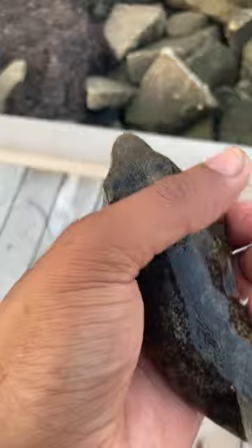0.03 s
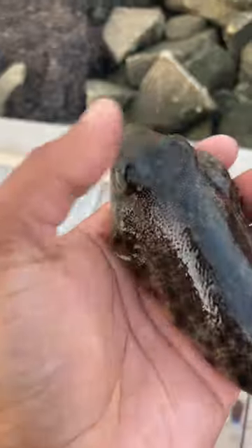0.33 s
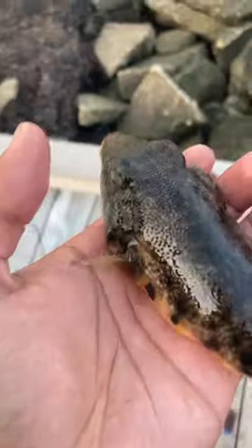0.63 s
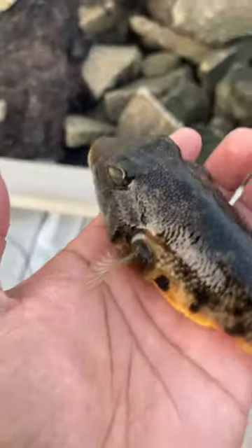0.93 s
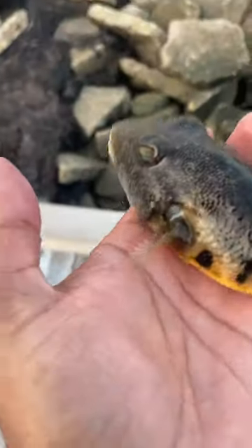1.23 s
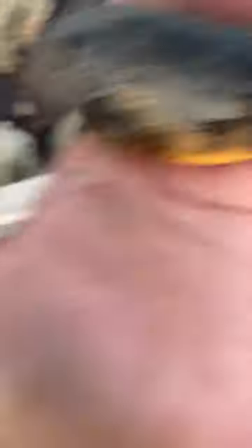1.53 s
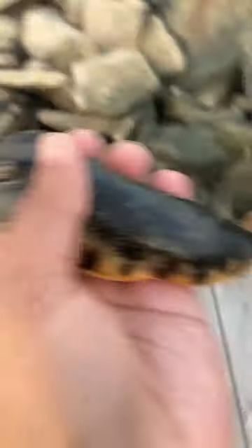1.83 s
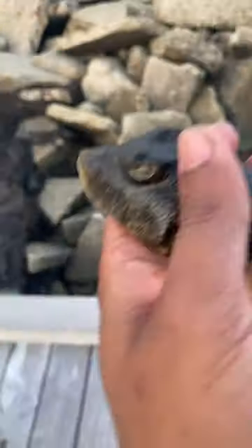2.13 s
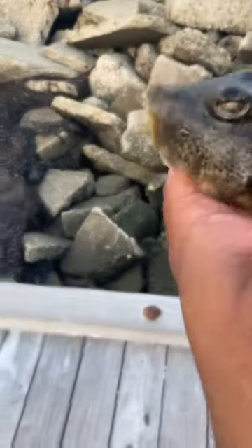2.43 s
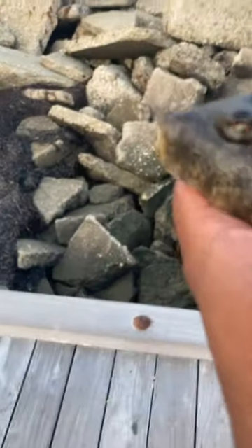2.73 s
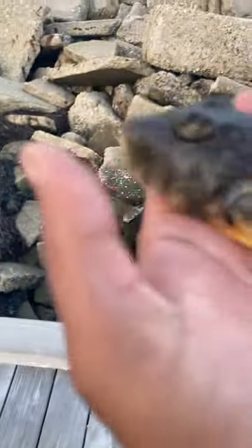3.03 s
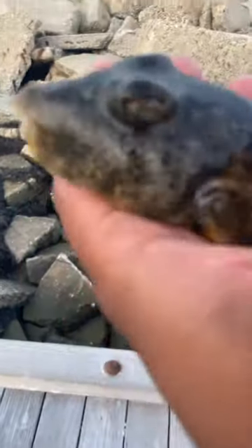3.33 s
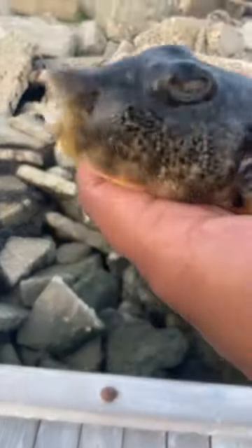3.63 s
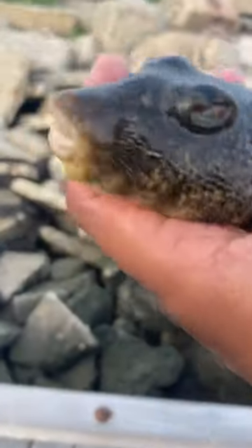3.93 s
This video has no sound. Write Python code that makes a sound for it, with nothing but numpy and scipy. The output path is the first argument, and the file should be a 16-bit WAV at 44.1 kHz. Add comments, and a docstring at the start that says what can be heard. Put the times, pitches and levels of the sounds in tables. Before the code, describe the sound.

Wind rumbles lightly on a close microphone on a dock, with faint water washing on rocks and soft rubs of a hand on a wet fish. Midway the air crackles, then gusts grow strong, hitting hardest at the end.

```python
"""Gusty wind on a dock beside a rocky shore, at a small hand-held pair of microphones. At first eddies rumble
lightly on the ports, water washes and fizzes on the rocks, and a hand shifts its grip on a wet fish with soft
rubs. Near 2 s the air crackles, a drip pings, and the fingers come unstuck in a few ticks. Then the wind grows
strong, the bass narrows to the centre, and the hardest buffets hit in the last half second."""
import sys
import numpy as np
from scipy import signal
from scipy.fft import rfft, irfft
from scipy.io import wavfile
from scipy.ndimage import uniform_filter1d

SR = 44100
rng = np.random.default_rng(int(sys.argv[2]) if len(sys.argv) > 2 else 0)


def wav_out(sig):
    """Save sig, one row per channel (or a flat mono array), as 16-bit PCM at SR to the path in sys.argv[1]."""
    wavfile.write(sys.argv[1], SR, np.round(np.clip(np.atleast_2d(sig).T, -1, 1) * 32767).astype(np.int16))


N = 176400
TIME_S = np.arange(N) / SR
FREQ_HZ = np.maximum(np.arange(N // 2 + 1) * SR / N, 1)
SIDE = np.array([[1], [-1]])


def from_db(db):
    """Decibels to gain."""
    return 10 ** (np.asarray(db) / 20)


def rms_one(x):
    """Scale to unit rms."""
    return x / np.sqrt(np.mean(x ** 2) + 1e-20)


def in_time(rows):
    """A control curve at every sample."""
    return np.interp(TIME_S, *np.transpose(rows))


def in_frequency(rows):
    """A curve at every FFT bin, interpolated in log frequency."""
    hz, value = np.transpose(rows)
    return np.interp(np.log(FREQ_HZ), np.log(hz), value)


def noise(gain, channels=2):
    """Independent noises with the given gain per bin, at unit rms."""
    return rms_one(irfft(rfft(rng.standard_normal((channels, N))) * gain, N))


def band_noise(hz, width):
    """Two noises with a bell spectrum in log frequency."""
    return noise(np.exp(-.5 * (np.log(FREQ_HZ / hz) / width) ** 2))


def even_noise(colour, span_s, channels=2):
    """Coloured noise with its slow swings divided out."""
    x = noise(from_db(in_frequency(colour)), channels)
    return x / np.sqrt(uniform_filter1d(x ** 2, int(span_s * SR), axis=-1) + 1e-9)


def drift(rate_hz):
    """Slow random curve at unit rms."""
    return noise(1 / (1 + (FREQ_HZ / rate_hz) ** 2), channels=1)[0]


def pair(x, likeness):
    """Mix two independent signals to left and right with a given correlation."""
    return (np.sqrt(1 + likeness) * x[0] + np.sqrt(1 - likeness) * x[1] * SIDE) / np.sqrt(2)


# Phase between the ports. Each row: frequency in Hz, lead of the left in radians.
PORT_LEAD_RAD = [(0, 0), (500, -.3), (1000, -3), (1900, -4.8), (3400, -3.7), (4400, -4.1), (5000, -3.3),
                 (5900, -3), (7000, -1.7), (7800, -.2), (9000, .2), (10200, 1.7), (11200, 3), (12300, 3.2),
                 (14000, 6), (16000, 6.3)]


def at_ports(x):
    """Sound from one side reaches the two ports out of step."""
    lead_rad = np.interp(FREQ_HZ, *np.transpose(PORT_LEAD_RAD))
    return np.array([x[0], irfft(rfft(x[1]) * np.exp(-1j * lead_rad), N)])


def drops(per_s=270, cycles_to_60_db=12, pitches=20):
    """Tiny bubbles and droplets ring for a few cycles each."""
    sizes = from_db(4 * np.minimum(rng.exponential(1, N), 3.5)) * rng.choice([-1, 1], N)
    clicks = sizes * (rng.random(N) < per_s / SR)
    pitch_index = rng.integers(0, pitches, N)
    out = np.zeros(N)
    for k, hz in enumerate(np.geomspace(1300, 10000, pitches)):
        radius = from_db(-60 * hz / (cycles_to_60_db * SR))
        angle = 2 * np.pi * hz / SR
        feedback = [1, -2 * radius * np.cos(angle), radius ** 2]
        out += signal.lfilter([0, np.sin(angle)], feedback, clicks * (pitch_index == k) + 1e-18)
    return rms_one(out)


# Stereo image of the water. Each row: frequency in Hz, left-right correlation.
WATER_CORRELATION = [(100, 0.85), (380, 0.97), (800, 0.27), (2000, 0.48), (4000, 0.68), (5400, 1),
                     (7000, 0.88), (8300, 1), (10000, 0.91), (11600, 1), (13000, 1), (15000, 0.7)]


def water_noise(colour, flicker_db, flicker_hz):
    """Half-octave bands of stereo noise, each flickering partly on its own."""
    spectra = rfft(rng.standard_normal((2, N))) * from_db(in_frequency(colour))
    stereo = pair(spectra, in_frequency(WATER_CORRELATION))
    band = np.floor(2 * np.log2(FREQ_HZ))
    in_range = (FREQ_HZ > colour[0][0]) & (FREQ_HZ < colour[-1][0])
    shared = drift(flicker_hz)
    out = 0
    for k in np.unique(band[in_range]):
        flicker = from_db(flicker_db * (.5 * shared + drift(flicker_hz)))
        out += irfft(stereo * (band == k), N) * flicker
    return rms_one(out)


# Water envelopes. Each row: time in seconds, level in dB before trim.
WASH_LEVEL_DB = [(0, -42), (.3, -41), (.55, -45), (.78, -42), (1.05, -41.5), (1.35, -42), (1.55, -46.5),
                 (1.7, -55.5), (4, -56)]
SPLASH_LEVEL_DB = [(0.05, -47.5), (0.35, -51), (0.39, -40.5), (0.52, -51.5), (0.62, -46.5), (2.14, -48.5),
                   (2.18, -42), (2.36, -51.5), (2.39, -39), (2.62, -50.5), (3.36, -47.5), (3.5, -40.5),
                   (3.51, -39), (3.59, -42.5), (3.79, -44), (3.84, -38), (3.92, -48), (4.0, -41.5)]
FIZZ_LEVEL_DB = [(0.05, -56.5), (0.42, -53.5), (0.53, -61.5), (0.64, -52.5), (0.75, -62.5), (0.97, -53.5),
                 (1.9, -57.5), (2.0, -50.5), (2.07, -56), (2.13, -49), (2.3, -56.5), (2.49, -53),
                 (2.94, -57), (3.2, -48.5), (3.37, -57), (3.39, -52), (3.75, -56.5), (3.86, -46.5),
                 (3.93, -59), (4.0, -52)]
# Water spectra. Each row: frequency in Hz, relative density in dB.
WASH_SPECTRUM_DB = [(100, -1.5), (220, -11), (310, -2.5), (405, 3), (560, -9), (780, -13), (1050, -3),
                    (1400, -23.5), (2200, -17.5)]
SPLASH_SPECTRUM_DB = [(850, -13), (1150, 0.5), (1550, 2.5), (2200, -1), (3000, -6), (4300, -9), (5500, -41),
                      (8000, -13.5)]
FIZZ_SPECTRUM_DB = [(2800, -4), (4200, 2), (5400, -1.5), (6300, 4), (7500, -2), (9300, 0.5), (11000, -0.5),
                    (13000, -5.5), (14500, -9.5), (16000, -21)]


def water(wash_trim_db=-.5, splash_trim_db=2, fizz_trim_db=8.5, drops_db=-13, pan_db=-1.6):
    """Distant wash, nearer splashes among the rocks and fizzing foam, arriving from one side."""
    wash = water_noise(WASH_SPECTRUM_DB, flicker_db=3.5, flicker_hz=13)
    wash *= from_db(in_time(WASH_LEVEL_DB) + wash_trim_db)
    splash = water_noise(SPLASH_SPECTRUM_DB, flicker_db=2.5, flicker_hz=17.7)
    splash += from_db(drops_db) * drops()
    splash *= from_db(in_time(SPLASH_LEVEL_DB) + splash_trim_db)
    fizz = water_noise(FIZZ_SPECTRUM_DB, flicker_db=2, flicker_hz=22)
    fizz *= from_db(in_time(FIZZ_LEVEL_DB) + fizz_trim_db)
    return at_ports(wash + splash) * from_db(pan_db * SIDE / 2) + at_ports(fizz)


# Each row: middle in seconds, half length in seconds, level in dB, centre in Hz, log-frequency width.
SKIN_RUBS = [(0.75, 0.11, -44.5, 9400, 0.093), (1.245, 0.019, -43, 4400, 0.042),
             (1.667, 0.093, -44.5, 3460, 0.18), (2.12, 0.13, -49.5, 7000, 0.13)]


def rubs():
    """Fingers slide over wet skin with soft rubs and squeaks."""
    out = 0
    for middle_s, half_s, db, hz, width in SKIN_RUBS:
        swell = np.exp(-.5 * ((TIME_S - middle_s) / half_s) ** 2)
        out += from_db(db) * swell * at_ports(pair(band_noise(hz, width), likeness=.73))
    return out


# Each row: start in seconds, level in dB, centre in Hz, log-frequency width, left minus right in dB. The first
# row is a short tonal drip; the rest are fingers coming unstuck.
TICKS = [(1.852, -30, 8800, 0.057, -1), (2, -27.5, 8250, 0.083, -1), (2.061, -35, 7900, 0.34, -8),
         (2.102, -42, 7900, .5, 2), (2.107, -24, 8200, 0.62, -1), (2.111, -32.5, 4530, 0.17, 1),
         (2.127, -30, 7900, 0.11, 0)]


def ticks(decay_s=.00091):
    """A short tonal drip pings, then fingers come unstuck from wet skin in small ticks."""
    out = 0
    for start_s, db, hz, width, pan_db in TICKS:
        decay = (TIME_S >= start_s) * np.exp(-np.clip((TIME_S - start_s) / decay_s, 0, 20))
        out += from_db(db + pan_db * SIDE / 2) * decay * band_noise(hz, width)
    return out


# Crackle envelope and its sharpest spits. Each row: time in seconds, level in dB.
CRACKLE_LEVEL_DB = [(0, -55), (1.3, -45.5), (1.5, -43.5), (1.9, -41), (2.1, -42), (2.35, -42), (2.8, -44.5),
                    (3.3, -48), (4, -65)]
SPIT_PEAKS_DB = [(1.597, -39), (1.659, -33), (1.709, -28), (1.746, -37), (1.781, -39), (1.825, -35),
                 (1.894, -26), (1.903, -30), (1.943, -31), (2.19, -39), (2.221, -32), (2.284, -34),
                 (2.314, -28), (2.333, -37), (2.421, -39), (2.453, -34), (2.632, -29), (2.707, -37),
                 (2.763, -35), (3.177, -34), (3.378, -42), (3.516, -21), (3.528, -23)]
# Each row: frequency in Hz, relative density in dB.
CRACKLE_SPECTRUM_DB = [(40, -10), (150, 11.5), (450, 0.5), (750, -2), (1100, -2), (1400, -7.5), (2000, -17),
                       (3500, -39), (8000, -56)]


def crackle(rough_db=2.5, rough_hz=70, spit_half_s=.002):
    """Air tearing past the ports crackles and spits, opposite in left and right."""
    level = from_db(in_time(CRACKLE_LEVEL_DB) + rough_db * np.clip(drift(rough_hz), -2, 2))
    for middle_s, db in SPIT_PEAKS_DB:
        level += from_db(db) * np.exp(-.5 * ((TIME_S - middle_s) / spit_half_s) ** 2)
    return level * even_noise(CRACKLE_SPECTRUM_DB, span_s=.008, channels=1) * SIDE


# Wind envelopes. Each row: time in seconds, level in dB before trim and random swings.
RUMBLE_LEVEL_DB = [(0.04, -32.5), (0.14, -40), (0.16, -30.5), (0.27, -45.5), (0.5, -36.5), (0.52, -47.5),
                   (0.72, -35), (0.76, -45.5), (0.87, -37), (1.16, -46.5), (1.2, -62), (1.27, -44.5),
                   (1.53, -31), (1.56, -46), (1.63, -37.5), (1.8, -41.5), (1.85, -26.5), (2.05, -34),
                   (2.13, -24.5), (2.26, -32), (2.29, -19), (2.41, -31), (2.49, -22), (2.54, -34.5),
                   (2.72, -23.5), (3.04, -22), (3.06, -25), (3.11, -17.5), (3.135, -31.5), (3.28, -20),
                   (3.32, -22), (3.35, -31), (3.49, -24.5), (3.52, -20.5), (3.63, -28), (3.7, -20),
                   (3.76, -28), (3.86, -14.5), (3.89, -20), (3.93, -17.5), (4.0, -26.5)]
FLUTTER_LEVEL_DB = [(0.04, -46.5), (0.16, -49), (0.26, -44.5), (1.15, -48), (1.3, -41), (1.62, -51),
                    (1.95, -57.5), (2.16, -41.5), (2.27, -31.5), (2.31, -41), (2.45, -32), (2.7, -38.5),
                    (2.84, -33), (3.46, -32), (3.58, -31), (3.86, -32.5), (4.0, -24.5)]
RASP_LEVEL_DB = [(0, -65), (2.1, -67), (2.3, -49), (2.7, -60.5), (2.95, -48), (3.1, -47), (3.2, -42),
                 (3.5, -46), (3.7, -47.5), (3.87, -36.5), (4, -47)]
# Wind spectra. Each row: frequency in Hz, relative density in dB.
RUMBLE_SPECTRUM_DB = [(18, -36), (30, -18), (45, 1), (60, 4), (80, 2), (110, -4.5), (160, -12),
                      (260, -30.5), (500, -65)]
FLUTTER_SPECTRUM_DB = [(60, -23), (130, 3), (185, 3.5), (290, -1), (420, -11), (600, -15), (900, -43),
                       (1500, -70)]
RASP_SPECTRUM_DB = [(200, -16), (400, 1.5), (650, -6.5), (1050, -5.5), (1400, -22.5), (2500, -51)]
# Stereo image of wind and buffets. Each row: time in seconds, left-right correlation.
WIND_CORRELATION = [(0, 0.16), (1.7, -0.28), (2.0, -0.64), (2.11, 0.86), (4, 0.94)]


def wind(rumble_trim_db=.5, flutter_trim_db=-2.5):
    """Pressure on the ports rumbles, fast turbulence flutters, and strong flow adds a rasp."""
    likeness = in_time(WIND_CORRELATION)
    lumps_db = 3.98 * np.clip(drift(rate_hz=24), -2, 2)
    sway_db = 1.8 * np.clip(drift(rate_hz=15), -2, 2)
    layers = [(RUMBLE_SPECTRUM_DB, in_time(RUMBLE_LEVEL_DB) + rumble_trim_db + sway_db),
              (FLUTTER_SPECTRUM_DB, in_time(FLUTTER_LEVEL_DB) + flutter_trim_db + lumps_db),
              (RASP_SPECTRUM_DB, in_time(RASP_LEVEL_DB) + lumps_db)]
    out = sum(from_db(db) * pair(even_noise(colour, span_s=.0378), likeness) for colour, db in layers)
    return out / np.sqrt((1 + likeness) / 2)  # mid level independent of width


# Each row: start in seconds, level in dB before trim, length in seconds, top in Hz.
EDDY_HITS = [(.038, -33.5, 0.013, 298), (.151, -28, 0.013, 218), (0.382, -31, 0.025, 850),
             (0.475, -28, 0.013, 298), (.705, -30, 0.013, 296), (1.402, -30.5, 0.0076, 704),
             (1.492, -27.5, .004, 1700), (1.821, -22.5, 0.032, 231), (1.9, -29.5, 0.0064, 1400),
             (2.109, -28.5, .037, 340), (2.243, -18.5, 0.0095, 480), (2.278, -22, 0.015, 320),
             (2.311, -18, 0.007, 544), (2.38, -28.5, 0.013, 560), (2.639, -31.5, 0.027, 630),
             (2.712, -26.5, 0.011, 625), (2.753, -27.5, 0.0094, 760), (2.831, -31, 0.0043, 690),
             (2.92, -28.5, .005, 820), (2.945, -30.5, 0.021, 830), (3.002, -25, 0.016, 920),
             (3.064, -23, 0.0058, 800), (3.185, -23, .005, 644), (3.321, -23.5, .004, 1160),
             (3.336, -23, 0.013, 650), (3.406, -23, .004, 690), (3.504, -14.5, 0.034, 330),
             (3.506, -12, 0.028, 700), (3.511, -18.5, 0.02, 1700), (3.545, -22.5, 0.012, 1410),
             (3.585, -21, 0.0085, 560), (3.678, -25, 0.011, 650), (3.84, -17, 0.0037, 1140),
             (3.857, -14, 0.014, 460), (3.877, -13.5, 0.008, 890), (3.904, -19, 0.025, 480)]


def buffets(trim_db=-3, low_hz=116, body_hz=330, gap_s=.0017, spread_db=3, max_kicks=32):
    """Each eddy hits the ports as a quick run of pressure kicks, cut steeply above its top."""
    likeness = in_time(WIND_CORRELATION)
    low_cut = signal.butter(2, low_hz, "high", fs=SR, output="sos")
    body = signal.butter(1, body_hz, fs=SR, output="sos")
    denormal_guard = 1e-18 * np.sin(TIME_S * 2000)
    out = np.zeros((2, N))
    for start_s, db, length_s, top_hz in EDDY_HITS:
        kicks = np.zeros((2, N))
        for channel in kicks:
            gaps_s = gap_s * rng.uniform(.413, 1.6, max_kicks)
            delays_s = np.cumsum(gaps_s) - gaps_s[0]
            sizes = rng.choice([-1, 1], max_kicks) * from_db(spread_db * rng.standard_normal(max_kicks))
            samples = np.minimum(((start_s + delays_s) * SR).astype(int), N - 1)
            channel[samples] = sizes * (delays_s < length_s)
        top_cut = signal.butter(6, top_hz, fs=SR, output="sos")
        burst = signal.sosfilt(np.vstack([low_cut, body, top_cut]), kicks + denormal_guard)
        burst_rms = np.sqrt(np.sum(burst ** 2, axis=1, keepdims=True) / ((length_s + gap_s) * SR))
        out += from_db(db + trim_db) * pair(burst / burst_rms, likeness)
    return out


# Each row: time in seconds, edge in Hz below which the sound is mono.
MONO_EDGE_HZ = [(2.05, 8), (2.15, 450), (2.75, 650), (2.85, 790), (4, 800)]


def narrow_bass(x, order=12):
    """From about 2.1 s the bass narrows to the centre below a rising edge."""
    mid, side = x.mean(axis=0), (x[0] - x[1]) / 2
    hz, frame_s, frames = signal.stft(side, SR, nperseg=1024)
    edge_hz = np.interp(frame_s, *np.transpose(MONO_EDGE_HZ))
    side_gain = 1 - 1 / (1 + (hz[:, None] / edge_hz) ** order)
    return mid + signal.istft(frames * side_gain, SR)[1][:N] * SIDE


def scene():
    """Wind on the ports over the water and the hand."""
    return narrow_bass(wind() + buffets() + crackle() + water() + rubs() + ticks())


def record(dry):
    """Silence for 35 ms, a 2 ms fade-in, and a steep low-pass at 15.8 kHz."""
    fade_in = np.clip((TIME_S - .035) / .002, 0, 1)
    low_pass = signal.ellip(10, .2, 80, 15800, fs=SR, output="sos")
    return signal.sosfilt(low_pass, dry * fade_in)


dry = scene()
out = record(dry)
wav_out(out)
```